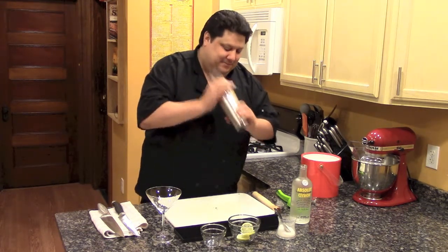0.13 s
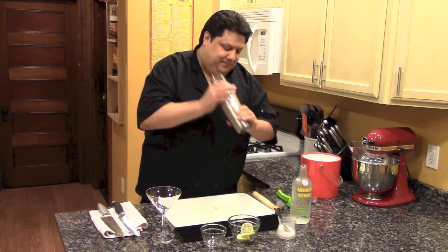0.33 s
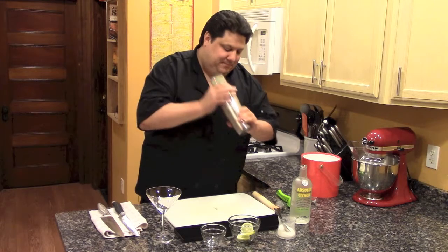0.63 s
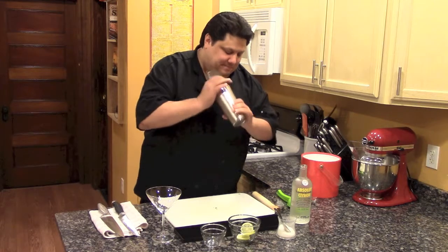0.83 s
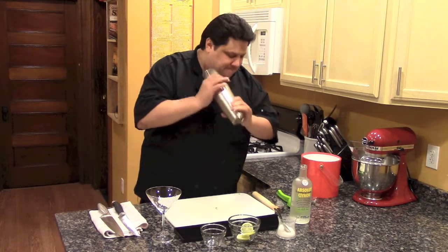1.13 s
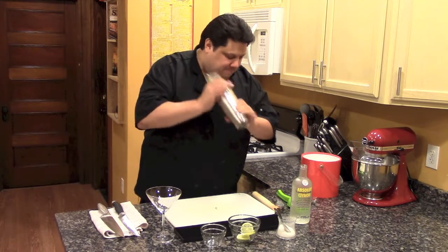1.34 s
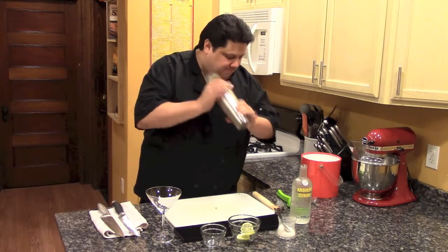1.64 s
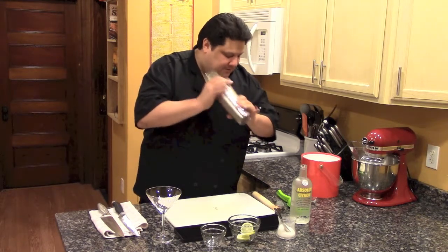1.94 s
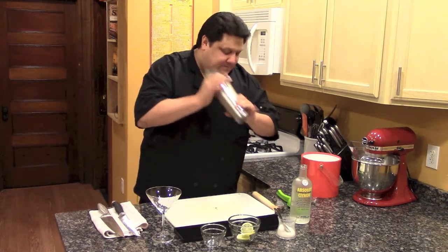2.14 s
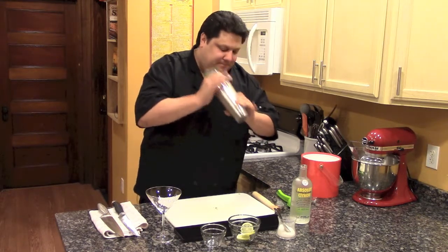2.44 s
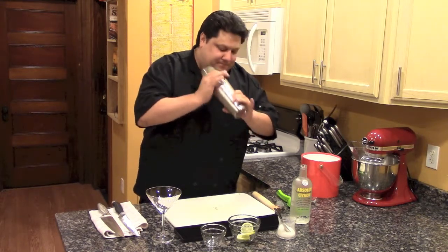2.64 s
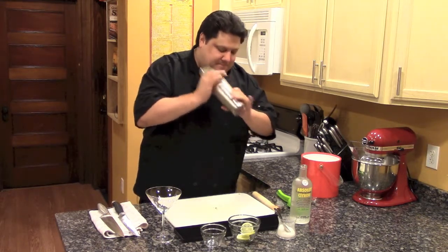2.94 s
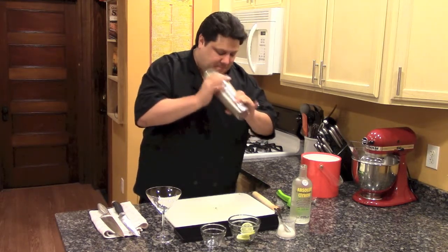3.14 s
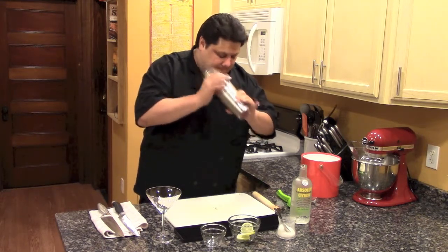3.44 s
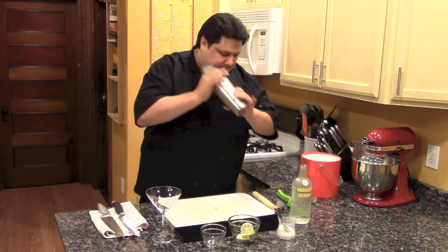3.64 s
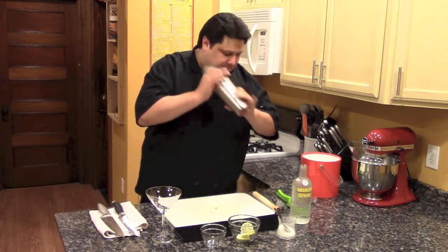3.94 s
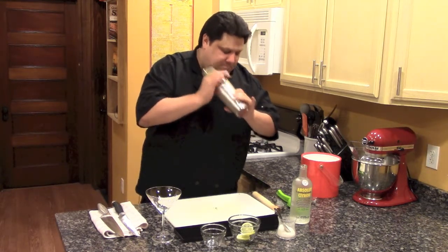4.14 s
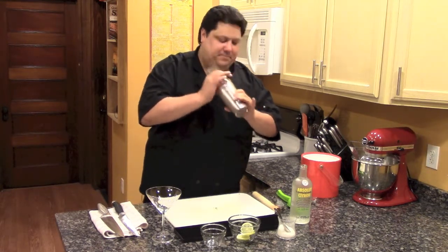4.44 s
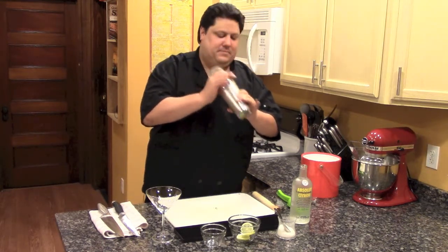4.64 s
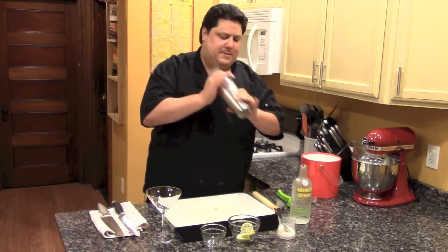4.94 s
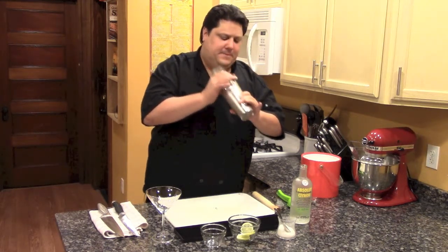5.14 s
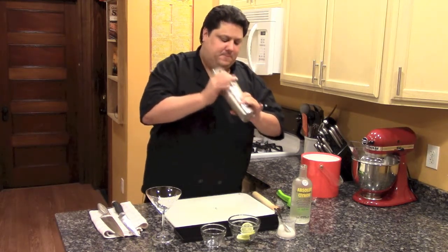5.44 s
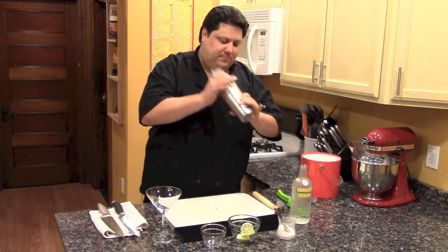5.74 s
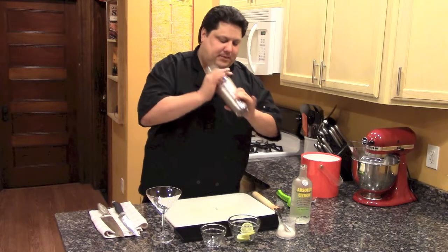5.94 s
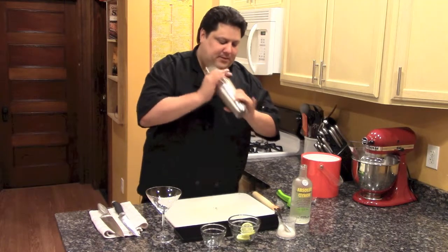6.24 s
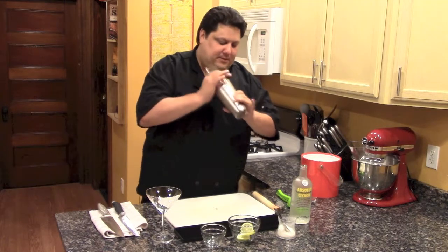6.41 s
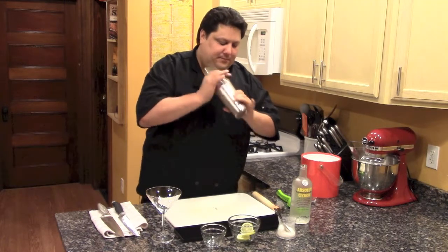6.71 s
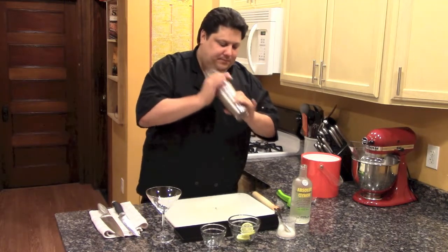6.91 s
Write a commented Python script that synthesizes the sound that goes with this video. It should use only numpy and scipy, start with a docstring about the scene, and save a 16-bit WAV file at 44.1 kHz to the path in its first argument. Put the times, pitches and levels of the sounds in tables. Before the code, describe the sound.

Ice and a drink are shaken hard in a steel shaker held close to the microphone in a kitchen. The shaking is already under way at 0 s and continues to the cut at about 7 s, with a slam roughly every 0.15 s. Each stroke swells from a lull into a crowded rattle of tiny collisions, with irregular hard knocks, brittle cracks, small ticks and some duller thuds. Liquid rushes in short noisy spurts, and the hand-damped steel rings only faintly. The first second and a half is moderate; from 1.6 to 4 s it is denser and stronger. Around 4.1-5 s the strokes are lighter and sparser, then they surge again from 5.3 to 6.1 s with bright, crackling hits. From 6.2 s it weakens, with fewer solid blows. A dull low flutter follows the strokes, with weak, sparse room reflections behind.

```python
"""Ice cubes and a drink shaken hard in a hand-held steel shaker, in a kitchen, close to the microphone.
Each stroke slams the load home: a surge of many small collisions, with single cubes cracking, knocking
and thudding around it, all made by noisy contacts ringing short modes. Liquid rushes as spurting coloured
noise, the gripped steel rings faintly in narrow modes, a dull low flutter follows the strokes, and
the kitchen adds weak sparse reflections."""
import sys
import numpy as np
from scipy import signal
from scipy.fft import rfft, irfft
from scipy.io import wavfile
from scipy.ndimage import uniform_filter1d

SR = 44100
rng = np.random.default_rng(int(sys.argv[2]) if len(sys.argv) > 2 else 0)


def dump_mix(stems):
    """Bounce the given channels to the path in sys.argv[1] as a 16-bit WAV at rate SR."""
    frames = np.atleast_2d(stems).T  # one column per channel
    limited = np.clip(frames, -1, 1)  # hard clip at full scale
    pcm = np.round(limited * 32767).astype(np.int16)
    wavfile.write(sys.argv[1], SR, pcm)


N = 311787  # samples, about 7.07 s


def amp(db):
    """Amplitude factor of a level in dB."""
    return 10 ** (np.asarray(db) / 20)


def evened(x):
    """Scales a signal to an RMS of one."""
    return x / np.sqrt(np.mean(x ** 2) + 1e-20)


def read(points, hz):
    """Reads a curve between its points, along a logarithmic frequency axis."""
    f, value = np.transpose(points)
    return np.interp(np.log(hz + 1), np.log(f + 1), value)


# Loud blows of whole cubes in the shaker, close to the microphone.
# Each row: start in seconds, then the levels of knock, crack, thud and tick in dB (energy spread over BLOW_S).
LOUD_BLOWS = [(0.0061, -28, -17.5, -53, -40), (0.015, -36, -24, -45, -38), (0.0555, -33, -14, -49, -31),
              (0.0971, -17, -28, -31, -35), (0.1063, -17, -22, -39, -31), (0.3729, -22.5, -13, -27, -23),
              (0.3846, -18, -24, -26, -35), (0.4397, -21.5, -21, -48, -18), (0.5153, -14.5, -19, -30, -31),
              (0.5203, -19, -27, -34, -23), (0.66, -20, -13, -22.5, -28), (0.6908, -27, -25, -39, -42),
              (0.7392, -39, -12.5, -54, -30), (0.75, -24, -29, -48, -37), (0.77, -28, -23, -49, -36),
              (0.8223, -19, -34, -25, -21), (0.8444, -18.5, -26, -24, -42), (0.8937, -24, -19, -38, -23),
              (0.91, -19.5, -17.5, -39, -19), (0.975, -15, -23, -17, -26), (1.0444, -20, -12.5, -39, -32),
              (1.0679, -23, -21, -46, -17.5), (1.1305, -20, -10.5, -28, -20),
              (1.2585, -14.5, -16.5, -37, -26), (1.3979, -17, -13.5, -28, -21),
              (1.4072, -18, -30, -33, -23), (1.4342, -17.5, -19, -41, -32), (1.5092, -26, -14.5, -46, -34),
              (1.5576, -18.5, -36, -19, -29), (1.5786, -17.5, -17, -36, -33), (1.586, -17, -21, -34, -29),
              (1.6575, -21, -14.5, -30, -13.5), (1.707, -15.5, -19, -36, -27), (1.7877, -33, -26, -30, -23),
              (1.7996, -28, -17, -41, -37), (1.9404, -21, -19.5, -33, -21), (2.007, -18, -35, -16, -29),
              (2.0864, -17, -13.5, -23, -24), (2.0979, -39, -32, -41, -33), (2.1141, -31, -19, -36, -33),
              (2.175, -20.5, -24, -19.5, -31), (2.2214, -23, -16, -27, -31), (2.2398, -23, -12.5, -34, -27),
              (2.2497, -26, -16.5, -40, -27), (2.281, -23, -20.5, -30.5, -27), (2.3024, -17, -18, -31, -28),
              (2.386, -20.5, -21, -33, -20), (2.4448, -20, -23, -23, -33), (2.461, -18, -26, -36, -47),
              (2.468, -22, -20.5, -34, -15), (2.4752, -24, -20, -27, -35), (2.5281, -19, -21, -39, -21),
              (2.5446, -25, -13, -46, -32), (2.563, -28, -14, -46, -17), (2.6222, -18, -24, -35, -32),
              (2.7013, -30, -20, -32, -40), (2.7497, -17, -19, -18.5, -20), (2.7593, -21, -20.5, -36, -31),
              (2.7808, -23, -23, -22.5, -21), (2.8274, -23, -19, -31, -30), (2.8678, -16, -33, -38, -34),
              (2.8853, -19, -21, -48, -29), (2.9012, -11, -20, -30, -19), (2.9267, -17.5, -16, -26, -26),
              (2.9736, -19, -13.5, -27, -18), (3.0476, -15, -19, -37, -21), (3.0559, -18, -17, -42, -23),
              (3.0747, -17, -34, -45, -34), (3.0808, -24, -30, -43, -29), (3.1407, -15.5, -21, -30, -22),
              (3.2013, -17, -21, -25, -21), (3.219, -18, -28, -35, -22), (3.2291, -18, -33, -29, -33),
              (3.282, -17.5, -18, -38, -27), (3.3343, -15, -23, -34, -18), (3.3588, -14.5, -19, -21, -32),
              (3.4204, -26, -18, -43, -21), (3.4376, -19, -16, -34, -14.5), (3.4577, -24, -13, -44, -35),
              (3.4796, -19, -12, -35, -20), (3.4995, -15, -25, -21, -30), (3.505, -22, -17, -21, -31),
              (3.5885, -19, -24, -42, -36), (3.6115, -22, -22, -43, -40), (3.6426, -15, -12.5, -39, -28),
              (3.7279, -17.5, -26, -36, -30), (3.7498, -23, -20.5, -43, -37), (3.8173, -13, -20, -23, -24),
              (3.899, -38, -20, -50, -39), (3.9644, -18, -27, -19, -29), (3.9724, -18.5, -28, -27, -25),
              (4.0083, -31, -11.5, -46, -21), (4.0325, -25, -32, -45, -42), (4.1626, -19.5, -26, -28, -37),
              (4.2536, -20.5, -28, -26, -23), (4.3245, -14, -16, -27, -20), (4.376, -18.5, -19, -23, -29),
              (4.5052, -26.5, -22.5, -35, -42), (4.5717, -21, -30, -29, -29),
              (4.6457, -33, -18.5, -46, -31), (4.6556, -23.5, -32, -41, -29), (4.706, -23.5, -46, -37, -32),
              (4.8078, -25, -24, -33, -33), (4.819, -36, -23, -45, -26), (4.8314, -25, -15, -35, -23),
              (4.9829, -21, -23, -33, -21), (4.9963, -20, -19, -36, -34), (5.0368, -19, -26, -45, -34),
              (5.0468, -31, -24, -39, -30), (5.1188, -21.5, -21.5, -34, -25),
              (5.1856, -19.5, -42, -38, -40), (5.2639, -20, -11.5, -37, -21), (5.2782, -23, -17, -36, -31),
              (5.3213, -15, -15, -29, -28), (5.3366, -16.5, -31, -18.5, -22),
              (5.4058, -17, -13.5, -28, -15), (5.4203, -19, -17, -43, -19), (5.4513, -36, -20.5, -42, -21),
              (5.4845, -19, -20, -35, -23), (5.4931, -24, -25, -22, -25), (5.5622, -20, -18, -29, -12.5),
              (5.5675, -21, -19.5, -32, -27), (5.5751, -21, -13, -45, -23), (5.6007, -38, -15, -42, -26),
              (5.6927, -29, -15, -30, -31), (5.7228, -17.5, -13, -27, -11),
              (5.7562, -15.5, -18, -30.5, -16), (5.7941, -16, -26, -25, -35),
              (5.8553, -23, -15.5, -42, -39), (5.878, -23, -16.5, -45, -27), (5.9304, -14.5, -25, -23, -17),
              (5.9551, -18, -21, -23.5, -29), (5.9941, -20, -18, -30, -20), (6.0108, -18, -18, -37, -19),
              (6.029, -27, -15, -42, -27), (6.071, -17.5, -22, -37, -21), (6.095, -17, -13.5, -22, -14),
              (6.1014, -23, -17, -39, -21), (6.1382, -45, -10, -44, -29), (6.319, -35, -25.5, -52, -30),
              (6.3287, -26.5, -23, -45, -30), (6.503, -34, -19.5, -39, -34), (6.5993, -23.5, -39, -31, -44),
              (6.692, -19.5, -26, -29, -38), (6.7049, -22, -26, -44, -38), (6.785, -22, -13.5, -45, -22),
              (6.8034, -34, -23, -52, -32), (6.8553, -29, -32, -31, -36), (6.8698, -17, -24, -27, -32),
              (6.9979, -22.5, -45, -29, -33)]


def blows():
    """Whole cubes strike wall, cap and each other: each a brief contact that rings damped modes."""
    return collide(*np.transpose(LOUD_BLOWS), contact_s=.0008, buzz_db=-12)


def in_flight(s):
    """True close before a loud blow (or close after the last): the load is in the air and quieter."""
    flight_s = .012
    loud = np.transpose(LOUD_BLOWS)[0]
    following = np.minimum(np.searchsorted(loud, s), len(loud) - 1)
    return abs(loud[following] - s) < flight_s


def strays(count=110):
    """Lesser cube blows at chance moments, some dull, some sharp, stronger when the load moves hard."""
    place, size, hard, heavy, bright = rng.random((count, 5)).T
    at = (np.arange(count) + place) / count * (N - 1)
    smooth_surge_db = uniform_filter1d(surge_db(), size=4000)
    level_db = smooth_surge_db[at.astype(int)] + 1.5 + 7.0 * (size - .5)
    level_db = level_db - 15 * in_flight(at / SR)
    knock_db = level_db - 7 * (hard - .5)
    crack_db = level_db - 3.0 + 12 * (hard - .5)
    thud_db = level_db - 13.5 + 14 * (heavy - .5)
    tick_db = level_db - 8.0 + 16 * (bright - .5)
    return collide(at / SR, knock_db, crack_db, thud_db, tick_db, contact_s=.0007, buzz_db=-10.5)


def tumble(count=1800):
    """Many small collisions that crowd together in each surge; a few stand out."""
    hush_db = -3.5  # they weaken by this much just before a loud blow
    place, size, hard, heavy, bright = rng.random((count, 5)).T
    crowd = np.cumsum(amp(.4 * surge_db()))
    at = np.searchsorted(crowd, (np.arange(count) + place) / count * crowd[-1])
    level_db = surge_db()[np.minimum(at, N - 1)] - 11.5
    level_db = level_db - 4.56 * np.log(0.05 + size)  # small draws give the few strong ones
    level_db = level_db + hush_db * in_flight(at / SR)
    crack_db = level_db - 11.5 + 12 * (hard - .5)
    thud_db = level_db - 8.0 + 9 * (heavy - .5)
    tick_db = level_db - 22.0 + 14 * (bright - .5)
    return collide(at / SR, level_db, crack_db, thud_db, tick_db, contact_s=0.00055, buzz_db=-18.5)


# Heavily damped modes of a collision, in four families from low to high, before each blow's own luck.
# Each row: frequency in Hz, peak level in dB within its family, time in seconds to fall about 41 dB.
THUD_MODES = [(565.5, 7.5, 0.13), (704.5, 4, 0.024), (998, 2, 0.0089), (1278, -2, 0.02)]
KNOCK_MODES = [(1690, -3, 0.016), (1957, 1.5, 0.0055), (2380, -0.5, 0.024), (2729, -5.5, 0.011)]
CRACK_MODES = [(3760, 10.4, 0.00092), (4186, 20.2, 0.0033), (5220, 14.5, 0.0029)]
TICK_MODES = [(9060, -1.5, 0.0009), (10600, -6, 0.0018), (14300, -3, 0.0014)]
BLOW_S, LENGTH = .004, 1024  # span in seconds for levels; samples kept of each collision


def collide(s, knock_db, crack_db, thud_db, tick_db, contact_s, buzz_db):
    """A collision is a swell of micro-contacts and a faint buzz after it, ringing four mode families."""
    t = np.arange(600) / SR
    luck = rng.standard_normal((len(s), 601))
    u = t / (contact_s * np.exp(0.28 * luck[:, :1]))  # time in units of the contact's own length
    swell = u ** 2 * np.exp(2 - 2 * u)
    buzz = amp(buzz_db) * np.minimum(u, 1) * np.exp(-t / 0.0078)
    contact = luck[:, 1:] * (swell + buzz)
    sound = family(contact, KNOCK_MODES, knock_db, spread_db=0.58, detune=0.051)
    sound = sound + family(contact, CRACK_MODES, crack_db, spread_db=4.9, detune=0.047)
    sound = sound + family(contact, THUD_MODES, thud_db, spread_db=6.0, detune=0.072)
    sound = sound + family(contact, TICK_MODES, tick_db, spread_db=6.0, detune=0.089)
    start = np.clip(np.round(s * SR).astype(int), 0, N)
    at = start[:, None] + np.arange(LENGTH)
    return np.bincount(at.ravel(), sound.ravel(), N + LENGTH)[:N]


def family(contact, modes, level_db, spread_db, detune):
    """Rings a set of modes from each contact; where the cube lands sets how much each mode gets."""
    hz, db, fall_s = np.transpose(modes)
    luck = rng.standard_normal((len(contact), 2, len(modes)))
    f = np.fft.rfftfreq(LENGTH, 1 / SR)
    width = 1.52 / fall_s  # bandwidth in Hz
    pitch = hz * (1 + detune * luck[:, 0])
    weight = amp(db + spread_db * luck[:, 1]) * width
    response = sum(weight[:, k, None] * 1j * f / (pitch[:, k, None] ** 2 - f ** 2 + 1j * f * width[k])
                   for k in range(len(modes)))
    rings = irfft(rfft(contact, LENGTH) * response, LENGTH)
    power = (rings ** 2).sum(1) / (BLOW_S * SR)
    return rings * (amp(level_db) / np.sqrt(power))[:, None]


# The load slams into the end of the shaker once a stroke.
# Each row: slam time in seconds, surge level in dB before each layer's own scaling, rise in seconds,
# level in dB at which the grip lets the steel ring.
SLAMS = [(0.094, -21, 0.09, -28), (0.228, -21, 0.044, -19), (0.388, -21, 0.042, -35),
         (0.525, -24, 0.058, -19), (0.671, -21, 0.045, -29), (0.849, -25, 0.064, -26),
         (0.975, -21, 0.07, -29), (1.133, -21, 0.046, -21.5), (1.265, -24, 0.037, -27),
         (1.413, -22.5, 0.048, -24), (1.588, -20, 0.058, -20), (1.72, -18, 0.084, -26),
         (1.875, -20, 0.045, -17), (2.014, -22, 0.027, -37), (2.159, -22, 0.033, -22),
         (2.313, -22, 0.037, -29), (2.465, -18, 0.048, -42), (2.626, -24, 0.109, -30),
         (2.764, -20, 0.044, -34), (2.904, -19, 0.06, -26), (3.073, -18, 0.063, -27),
         (3.216, -19, 0.085, -37), (3.366, -17.5, 0.065, -27), (3.501, -19, 0.042, -31),
         (3.65, -24, 0.075, -28), (3.814, -20.5, 0.037, -31), (3.97, -18.5, 0.064, -39),
         (4.116, -25, 0.04, -23), (4.258, -24, 0.042, -33), (4.39, -24, 0.034, -27),
         (4.574, -24, 0.063, -28), (4.743, -29, 0.067, -23), (4.91, -21.5, 0.132, -27),
         (5.039, -23, 0.066, -28), (5.207, -22, 0.091, -34), (5.33, -17, 0.08, -30),
         (5.495, -19, 0.114, -42), (5.645, -19, 0.102, -30), (5.799, -22, 0.055, -29),
         (5.94, -22, 0.032, -19.5), (6.103, -19, 0.053, -41), (6.236, -26, 0.027, -32),
         (6.409, -28, 0.047, -29), (6.558, -27, 0.045, -20), (6.702, -21, 0.039, -30),
         (6.866, -22, 0.102, -33), (7.007, -26, 0.03, -24)]
# Between strokes the load never quite rests. Each row: time in seconds, level in dB on the surge's scale.
REST = [(0, -28), (.3, -36), (.9, -33), (1.1, -36), (2, -33), (3, -30), (3.6, -29), (3.8, -38), (4.3, -35),
        (5.1, -36), (5.4, -30), (6.05, -33), (6.2, -43), (6.5, -37), (7.07, -36.5)]


def surge_db():
    """The level of the moving load: it climbs from the lull to each slam and sinks until the next climb."""
    s, db, rise, _ = np.transpose(SLAMS)
    lull_db = np.interp(s - rise, *np.transpose(REST))
    times = np.append(np.transpose([s - rise, s]), N / SR)
    levels = np.append(np.transpose([lull_db, db]), db[-1])
    return np.interp(np.arange(N) / SR, times, levels)


def freedom_db():
    """How freely the hands let the steel ring, held through each stroke."""
    s, _, rise, ring_db = np.transpose(SLAMS)
    stroke = np.maximum(np.searchsorted(s - rise, np.arange(N) / SR) - 1, 0)
    return uniform_filter1d(ring_db[stroke], size=600)


# Rushing liquid inside the shaker. Each row: frequency in Hz, relative spectral density in dB per Hz.
LIQUID = [(150, -15.5), (350, -17.5), (600, -4.5), (1900, -6), (3200, -11), (4400, -9.5), (6500, -9),
          (9000, -11.5), (15000, -11)]


def slosh():
    """Liquid and ice chips rush along the wall as noise in quick spurts; a trickle never stops."""
    spurts = evened(uniform_filter1d(rng.standard_normal(N), size=130))
    rush = noise(LIQUID, patchy_db=2.0)
    flow = amp(surge_db() - 12.0) + amp(-49.5)  # the surge and the trickle
    return flow * amp(8.18 * np.clip(spurts, -2, 2)) * rush


def noise(spectrum, patchy_db):
    """Coloured noise whose level wanders in small patches of time and pitch."""
    frames, hz = N // 128 + 5, np.fft.rfftfreq(512, 1 / SR)
    a, b, patches = rng.standard_normal((frames, 257, 3)).T
    patches = uniform_filter1d(patches, size=9, axis=0)  # along pitch
    patches = evened(uniform_filter1d(patches, size=4, axis=1))  # along time
    z = (a + 1j * b) * amp(read(spectrum, hz)[:, None] + patchy_db * patches)
    return evened(signal.istft(z, nperseg=512, noverlap=384)[1][:N])


# The gripped steel body. Each row: frequency in Hz, relative level in dB, time in seconds to fall 60 dB.
STEEL_MODES = [(709, -3, .3), (775, -9, .2), (1829, 2, .35)]


def steel(x):
    """The narrow modes of the body, set ringing by the sound fed in."""
    t = np.arange(SR // 4) / SR
    ring = sum(amp(db - 60 * t / t60) * np.cos(2 * np.pi * hz * t) for hz, db, t60 in STEEL_MODES)
    return signal.oaconvolve(x, ring / np.linalg.norm(ring))[:N]


# Low flutter under the shaking. Each row: frequency in Hz, relative spectral density in dB per Hz.
FLUTTER = [(20, 11.5), (60, 7), (130, 7), (400, -19)]


def jolts():
    """Each stroke stirs a dull low flutter: low noise that follows the surge less steeply."""
    return amp(0.68 * surge_db() - 35) * noise(FLUTTER, patchy_db=2.5)


# The kitchen around the shaker. Each row: frequency in Hz, time in seconds to fall 60 dB.
ROOM_DECAY = [(300, 0.2), (12000, 0.57)]


def kitchen(x):
    """Sparse reflections of random sign after a short gap, each band dying at its own speed."""
    taps = np.zeros(SR // 2)
    at = np.arange(200, len(taps) - 20, 20)
    taps[at + rng.integers(0, 20, len(at))] = rng.choice([-1., 1.], len(at))
    hz, t, z = signal.stft(taps, SR, nperseg=256)
    decay = amp(-60 * t / read(ROOM_DECAY, hz)[:, None])
    tail = signal.istft(z * decay, SR, nperseg=256)[1]
    return signal.fftconvolve(x, tail / np.linalg.norm(tail))[:N]


def scene():
    """Ice, ringing steel and slosh close by, with the faint kitchen and the low flutter behind."""
    ice = blows() + strays() + tumble()
    shaker = ice + amp(freedom_db()) * steel(ice) + slosh()
    flutter = jolts()
    return (shaker + amp(-23.5) * kitchen(shaker) + flutter)[None]


# Colour of the close microphone. Each row: frequency in Hz, gain in dB.
MICROPHONE_COLOUR = [(200, 1), (5000, 1.75), (5900, -11.5), (7500, -9.5), (8300, -4), (13000, -12),
                     (16000, -20)]


def record(dry):
    """The microphone colours the sound, the loudest peaks are rounded off; then the band limit."""
    edge_hz = 16100
    hz = np.linspace(0, SR / 2, 257)
    colour = signal.firwin2(255, hz, amp(read(MICROPHONE_COLOUR, hz)), fs=SR)
    coloured = signal.oaconvolve(dry, colour[None], "same")
    rounded = 1.22 * np.tanh(coloured / 0.96)
    band_limit = signal.firwin(511, edge_hz, window=("kaiser", 9), fs=SR)
    return signal.oaconvolve(rounded, band_limit[None], "same")


dry = scene()
out = record(dry)
dump_mix(out)
```